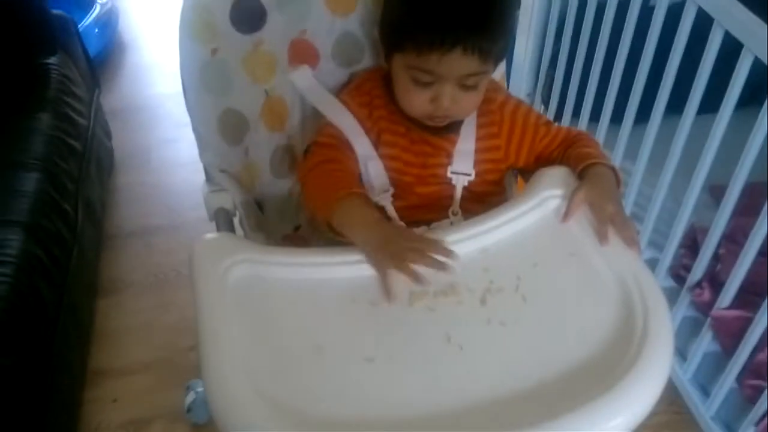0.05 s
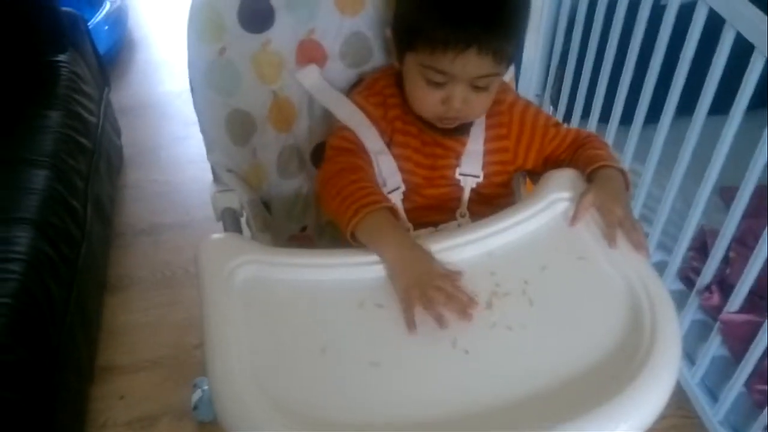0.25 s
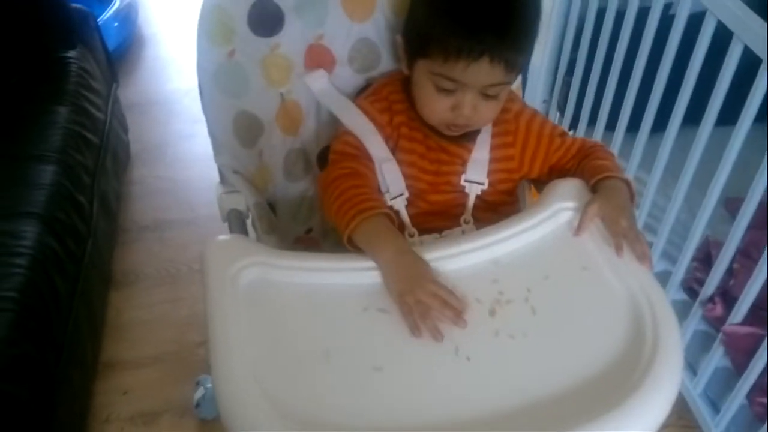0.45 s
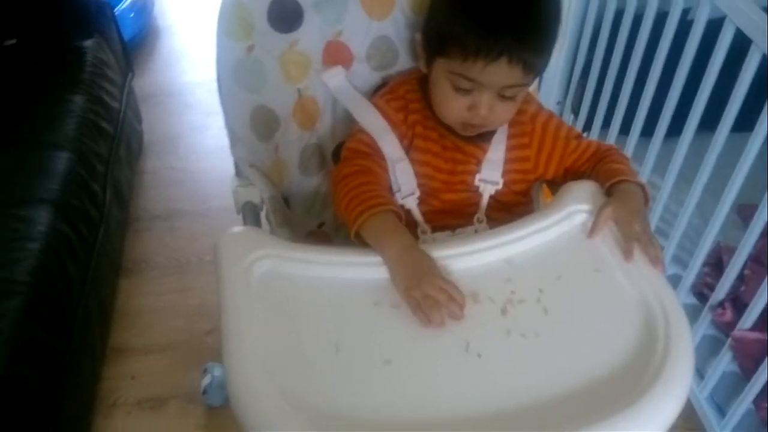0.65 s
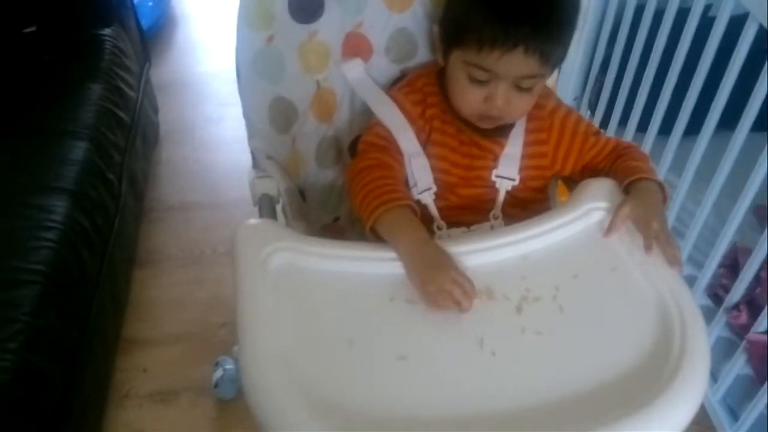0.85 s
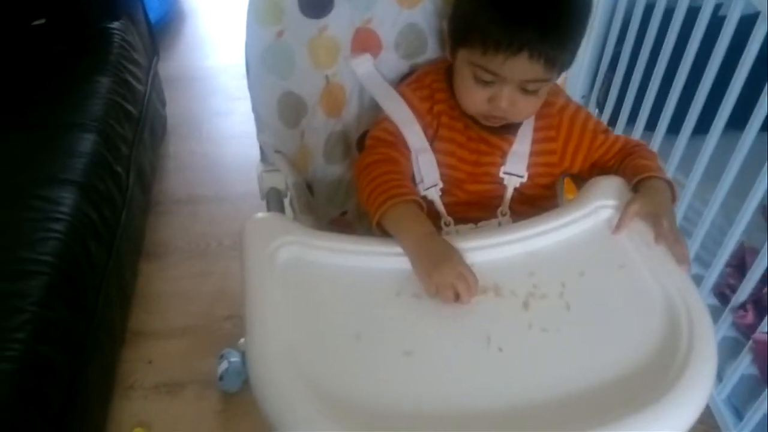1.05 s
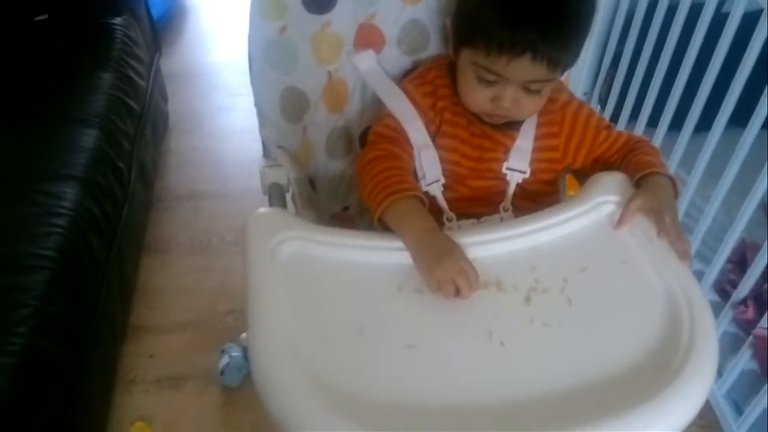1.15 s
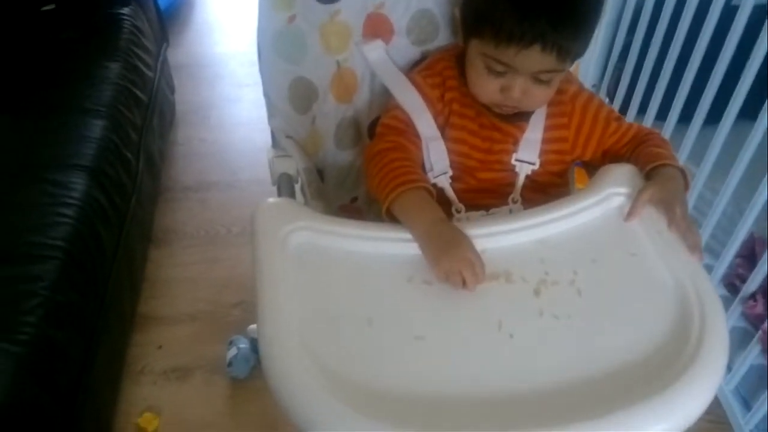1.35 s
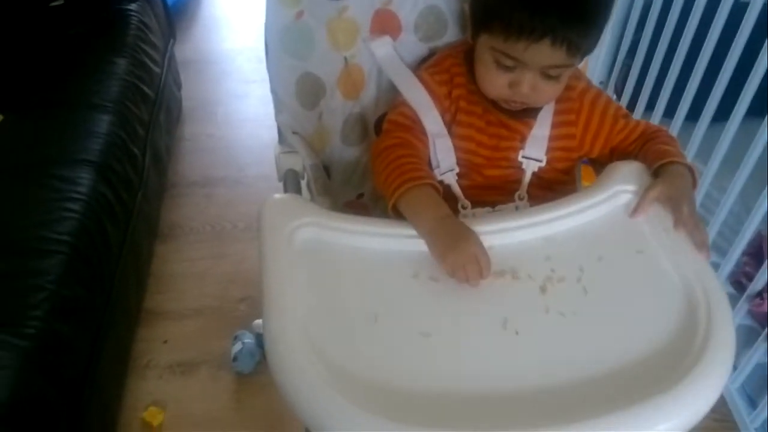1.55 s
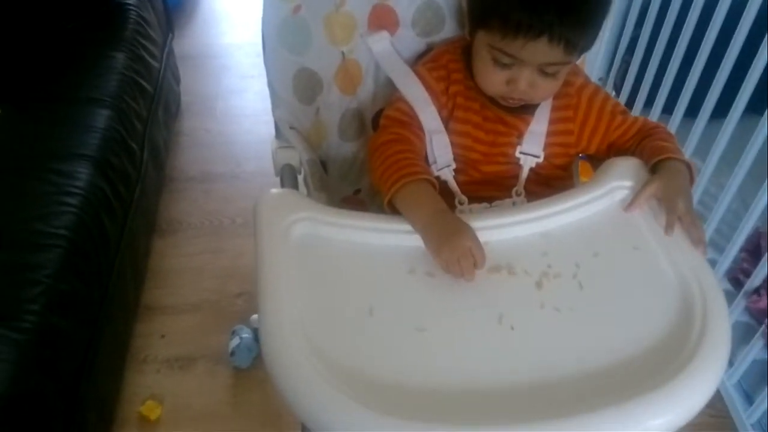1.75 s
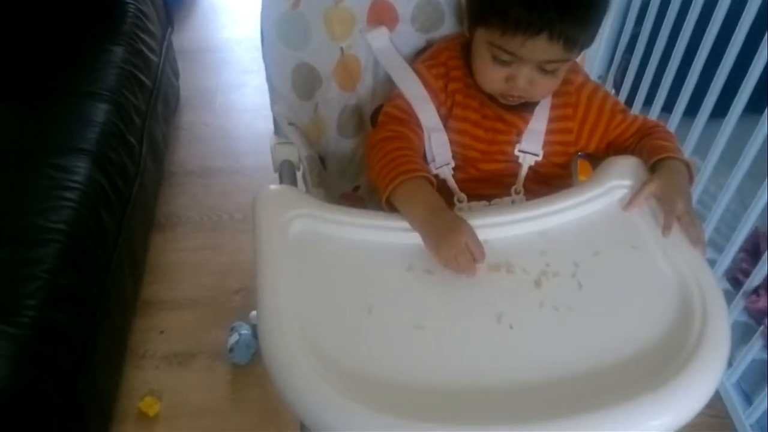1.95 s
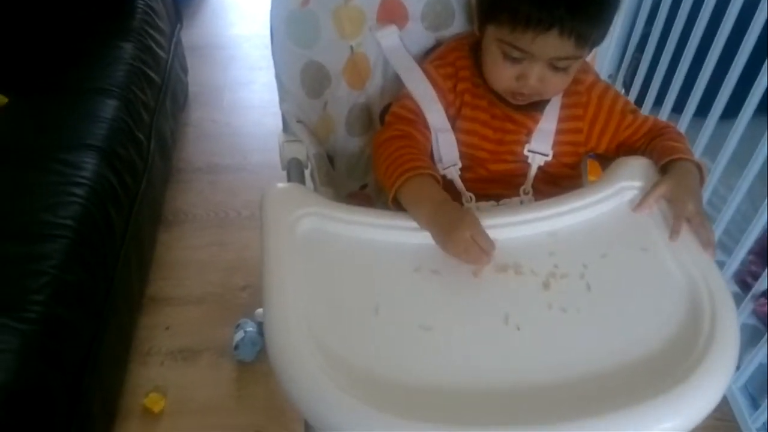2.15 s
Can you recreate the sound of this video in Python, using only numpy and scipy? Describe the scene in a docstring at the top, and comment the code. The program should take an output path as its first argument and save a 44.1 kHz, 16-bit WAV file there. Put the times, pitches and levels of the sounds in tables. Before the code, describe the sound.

One close thump of a palm on a plastic tray, with a short clack and low bounce. Afterwards fingers lightly tap and brush the tray over quiet room noise and a faint distant motor hum.

```python
"""One close thump: a small hand on the plastic tray of a high chair, in a quiet furnished room.
The fingers slap, the palm follows; the tray rings, clacks in its catch and bounces on its mounts.
The whole ring drops quickly in level near 0.3 s. Faint taps and a rustle of sleeve and fingers follow.
Behind them: room noise, a fading hiss, a distant motor speeding up, faint hums and a thin whine."""
import sys
import numpy as np
from scipy import signal
from scipy.fft import rfft, irfft, next_fast_len
from scipy.io import wavfile
from scipy.ndimage import map_coordinates

SR = 44100
rng = np.random.default_rng(int(sys.argv[2]) if len(sys.argv) > 2 else 0)


def to_wav(sig):
    """Store sig (one row per channel, or 1-D mono) as 16-bit WAV at the path in sys.argv[1].

    Samples outside -1..1 are clipped; the rate is SR.
    """
    pcm = np.clip(np.atleast_2d(sig), -1, 1) * 32767
    pcm = np.round(pcm).astype(np.int16)
    wavfile.write(sys.argv[1], SR, pcm.T)  # frames by channels


N = 97020

# left-right likeness of contacts and of background noise: (frequency [Hz], correlation [-1..1])
HIT_CORRELATION = [(100, 0.94), (300, 0.86), (650, 0.86), (1000, 0.43), (1450, 0.061), (2200, -0.49),
                   (4000, -0.22), (9000, 0.98)]
AIR_CORRELATION = [(60, 0.69), (150, 0.42), (380, 0.52), (950, 0.36), (2380, 0.041), (5980, 0.041),
                   (15000, -0.23)]
# tray balance: (frequency [Hz], left lift and right cut [dB])
TRAY_BALANCE = [(60, 1), (180, -1.5), (600, 0.1), (1300, 0.5), (2400, 2.5), (5000, 3.5)]


def thump(drop_s=0.303, drop_span_s=0.0074, drop_db=-5.5):
    """The hand lands in four quick contacts; the whole ring drops quickly in level near 0.3 s."""
    # parts of the hand landing: (time [s], level [dB], brightness [Hz])
    landings = [(.1975, -13, 850), (.2072, -2.5, 3400), (.2145, 0.5, 1100), (.2202, -4, 1700)]
    tray = sum(contact(*row) for row in landings) + pushes()
    blow = placed(tray, TRAY_BALANCE) + slap() + bounce()
    drop = (1 + np.tanh((since(0) - drop_s) / drop_span_s)) / 2
    return blow * amp(drop_db * drop)


def contact(s, db, bright_hz):
    """One touch rings the tray's modes and shell; the room answers 14 ms later."""
    # tray modes: (frequency [Hz], level [dB], t60 [s])
    modes = [(108, -55, .2), (134.6, -43.5, 0.18), (172.1, -46.5, 0.24), (223.4, -56, 0.37),
             (282.6, -47.5, 0.32), (554.5, -41.5, 0.12), (727.3, -35.5, 0.096), (852, -56.5, 0.21),
             (1110, -46, 0.23), (1189.6, -39, 0.15), (1386, -43.5, 0.13), (1524, -41, 0.075),
             (1812, -41, 0.11), (2121, -52, 0.35)]
    # dense shell resonances: (frequency [Hz], density [dB])
    shell_spectrum = [(60, -38), (200, 0.5), (400, -9.5), (640, 1), (800, 7), (1200, -5), (1900, 4.5),
                      (2700, -10.5), (5000, -23), (14000, -34)]
    ring = np.zeros((2, N))
    for hz, mode_db, t60_s in modes:
        spread_rad = half_angle(HIT_CORRELATION, hz) * np.array([[1], [-1]])
        mode = np.sin(2 * np.pi * hz * since(s) + spread_rad)
        ring += amp(mode_db) * lowpass(hz, bright_hz) * fade(s, t60_s, attack_s=0.00055) * mode
    shell = filtered(noise(shell_spectrum, HIT_CORRELATION), lambda hz: lowpass(hz, bright_hz))
    shell *= amp(-33) * fade(s, t60_s=0.088, attack_s=0.00038)
    return amp(db) * (ring + shell + reverb(s + 0.014, bright_hz))


def slap():
    """Skin cracks on the plastic, then the tray clacks in its catch."""
    # crack and clack spectra: (frequency [Hz], density [dB])
    crack_spectrum = [(200, -18), (900, 20), (1500, 13.5), (2600, -4.5), (3500, 1.5), (4300, -7),
                      (5500, -4), (7500, -19), (11000, -20), (15000, -48)]
    clack_spectrum = [(800, -30), (2400, 1), (3650, 7), (4300, -6), (5500, -11.5), (7000, -32),
                      (14000, -47)]
    crack = noise(crack_spectrum, HIT_CORRELATION) * fade(0.2072, t60_s=0.0087, attack_s=0.0001)
    clack = noise(clack_spectrum, HIT_CORRELATION) * fade(0.2235, t60_s=0.044, attack_s=0.00059)
    return amp(-35.5) * pan(left_db=12) * crack + amp(-47) * pan(left_db=3) * clack


def bounce(start_s=0.2178, rest_hz=49.6, sag_hz=13.6, sag_s=0.043):
    """The whole tray swings on its mounts, sagging in pitch."""
    t = since(start_s)
    hz = rest_hz + sag_hz * np.exp(-t / sag_s)
    swing = np.sin(phase(hz * (t > 0))) * fade(start_s, t60_s=0.36, attack_s=0.016)
    return amp(-25.5) * pan(left_db=-1.5) * swing


def pushes():
    """The hand's weight presses the tray down: pressure bumps with a dip on either side."""
    # pressure pulses: (time [s], level [dB], half-width [s])
    pulses = [(0.2007, -47, 0.0014), (0.2206, -31.5, 0.0008), (0.255, -43, .0016)]
    out = np.zeros(N)
    for s, db, half_width_s in pulses:
        x = (since(0) - s) / half_width_s
        out += amp(db) * (1 - x ** 2) * np.exp(-x ** 2 / 2)
    return out


def reverb(s, bright_hz):
    """Room tail of a contact; the decay rate varies with frequency."""
    # room response: (frequency [Hz], density [dB])
    spectrum = [(100, 7), (400, -8), (700, -4.5), (1400, 3), (2100, 4.5), (2800, -6.5), (5000, -15),
                (14000, -31)]
    # room decay: (frequency [Hz], t60 [s])
    decay_times = [(150, 0.35), (700, 0.24), (2000, 0.21), (4000, 0.18), (10000, 0.24)]
    hz, t, bins = signal.stft(noise(spectrum, HIT_CORRELATION), SR, nperseg=256)
    hz = hz[:, None]
    decay = amp(-60 * np.maximum(t - s, 0) / along(decay_times, hz))
    _, tail = signal.istft(bins * decay * lowpass(hz, bright_hz), SR, nperseg=256)
    build_up = 1 - np.exp(-since(s) / 0.0054)
    return amp(-37.5) * tail[:, :N] * build_up


def taps():
    """Fingers touch the tray lightly, twice."""
    # finger contacts: (time [s], level [dB], brightness [Hz])
    touches = [(.629, -26.5, 840), (1.096, -27.5, 1200)]
    return placed(sum(contact(*row) for row in touches), TRAY_BALANCE)


def brushes(width_oct=1.37, grain_db=2):
    """Sleeve and fingers rub the tray: grainy noise bands that swell and fade."""
    # strokes: (peak time [s], length [s], level [dB], centre [Hz])
    strokes = [(0.48, 0.17, -75.5, 1880), (0.577, 0.0073, -71.5, 8900), (1.32, 0.042, -72, 2180),
               (1.399, 0.12, -73.5, 2600), (1.487, 0.061, -73, 4040), (1.587, 0.072, -77, 4360),
               (1.593, 0.19, -71.5, 1970), (1.853, .12, -79, 10000)]
    out = np.zeros((2, N))
    for peak_s, length_s, db, centre_hz in strokes:
        band = lambda hz: 1 / (1 + (2 * np.log2((hz + 1) / centre_hz) / width_oct) ** 2)
        rub = filtered(rng.standard_normal((2, N)), band)
        grain = amp(grain_db * wobble(rate_hz=180))
        swell = np.exp(-(2 * (since(0) - peak_s) / length_s) ** 2)
        out += amp(db) * unit(rub * grain) * swell
    return pan(left_db=2) * out


def motor(waver_db=1, rush_db=-8.5):
    """A distant motor slowly speeds up: a low tone with an airy rush."""
    # motor tone: (time [s], frequency [Hz], level [dB])
    track = [(0, 83.54, -72), (1.002, 86, -71), (1.351, 88, -65.5), (2.2, 95.34, -65.5)]
    # airy rush: (frequency [Hz], density [dB])
    rush_spectrum = [(100, -5), (220, -5), (320, 5), (480, -7.5), (660, 4.5), (900, -9), (1400, -18.5),
                     (4000, -40)]
    hz, db = over_time(track)
    tone = amp(waver_db * wobble(rate_hz=7.14)) * np.sin(phase(hz))
    rush = amp(rush_db) * noise(rush_spectrum, AIR_CORRELATION)
    return amp(db) * (tone + rush)


def hums(drone_hz=417, waver_db=1, waver_rad=0.5):
    """Faint wavering hum lines, and a drone that comes and goes."""
    # hum lines: (frequency [Hz], start level [dB], end level [dB])
    ramps = [(120.5, -73.5, -72), (623, -114, -77.5)]
    # drone swells: (time [s], level [dB])
    swells = [(.85, -92), (1.05, -72.5), (1.2, -98), (1.4, -73), (1.75, -90.5), (1.93, -69), (2.2, -80.5)]
    lines = [(hz, np.linspace(start_db, end_db, N)) for hz, start_db, end_db in ramps]
    lines.append((drone_hz, over_time(swells)[0]))
    out = np.zeros(N)
    for hz, db in lines:
        gain = amp(db + waver_db * wobble(rate_hz=6))
        out += gain * np.sin(2 * np.pi * hz * since(0) + waver_rad * wobble(rate_hz=8))
    return out


def whine(half_width_hz=55):
    """A thin, high noise band drifts in pitch and level."""
    # band drift: (time [s], centre [Hz], level [dB])
    track = [(0, 3350, -81), (.55, 3355, -80.5), (.8, 3070, -86.5), (1.4, 3210, -89.5),
             (1.699, 3287, -83.5), (2.2, 3270, -84.5)]
    hz, db = over_time(track)
    i, q = filtered(rng.standard_normal((2, 2, N)), lambda f: lowpass(f, half_width_hz))
    return amp(db) * unit(i * np.cos(phase(hz)) + q * np.sin(phase(hz)))


def room_noise(hiss_db_per_s=-10):
    """Steady low room noise and a faint hiss that dies away."""
    # room noise and hiss spectra: (frequency [Hz], density [dB])
    air_spectrum = [(20, -89), (52, -82), (110, -94), (220, -101), (320, -100), (480, -103), (720, -99),
                    (1400, -110), (2700, -111), (3200, -109), (3600, -115), (6000, -118), (10000, -119),
                    (15500, -122.5)]
    hiss_spectrum = [(500, -5), (2000, 3), (4000, -1), (8000, -5.5), (15000, -15.5)]
    # balance of both: (frequency [Hz], left lift and right cut [dB])
    balance = [(40, 1), (120, 2.3), (650, 2), (1500, 1.3), (8000, 1), (15000, -0.5)]
    air = amp(-64.5) * noise(air_spectrum, AIR_CORRELATION)
    hiss = amp(-75 + hiss_db_per_s * since(0)) * noise(hiss_spectrum, AIR_CORRELATION)
    return placed(air + hiss, balance)


def amp(db):
    """Decibels to gain."""
    return 10 ** (np.asarray(db) / 20)


def unit(x):
    """Scale to rms 1."""
    return x / np.sqrt(np.mean(x ** 2) + 1e-20)


def since(s):
    """Seconds since s, zero before it."""
    return np.maximum(np.arange(N) / SR - s, 0)


def phase(hz):
    """Running phase [rad] of a varying frequency."""
    return 2 * np.pi * np.cumsum(hz) / SR


def fade(s, t60_s, attack_s):
    """Quick rise at s, then exponential decay."""
    t = since(s)
    return (1 - np.exp(-t / attack_s)) * amp(-60 * t / t60_s)


def wobble(rate_hz):
    """Smooth random curve, rate_hz knots a second."""
    knots = rng.standard_normal(int(N * rate_hz / SR) + 4)
    return map_coordinates(knots, [np.arange(N) * rate_hz / SR])


def over_time(points):
    """One per-sample curve for each column after the time column."""
    s, *columns = np.transpose(points)
    return [np.interp(since(0), s, column) for column in columns]


def along(points, hz):
    """Interpolate (frequency, value) points on a log axis."""
    knots_hz, values = np.transpose(points)
    return np.interp(np.log(hz + 1), np.log(knots_hz + 1), values)


def lowpass(hz, corner_hz):
    """Second-order low-pass gain."""
    return 1 / np.sqrt(1 + (hz / corner_hz) ** 4)


def filtered(x, response):
    """Apply the gain response(hz)."""
    size = next_fast_len(N + SR // 2)
    return irfft(rfft(x, size) * response(np.fft.rfftfreq(size, 1 / SR)), size)[..., :N]


def half_angle(correlation, hz):
    """Half the left-right angle [rad] that gives this correlation."""
    return np.arccos(np.clip(along(correlation, hz), -1, 1)) / 2


def noise(spectrum, correlation):
    """Coloured stereo noise of rms 1; the spectrum sets shape only."""
    def response(hz):
        angle = half_angle(correlation, hz)
        return amp(along(spectrum, hz)) * [np.cos(angle), np.sin(angle)]
    mid, side = filtered(rng.standard_normal((2, N)), response)
    return unit(np.array([mid + side, mid - side]))


def pan(left_db):
    """Gains that lift the left channel and cut the right."""
    return amp(left_db * np.array([[1], [-1]]))


def placed(x, balance):
    """Pan by frequency."""
    return filtered(x, lambda hz: pan(along(balance, hz)))


def scene():
    """The thump and the small sounds after it, over the quiet room."""
    hand = thump() + taps() + brushes()
    tones = pan(left_db=1) * (motor() + hums() + whine())
    return hand + tones + room_noise()


def record(dry, top_hz=15700):
    """Brick-wall low-pass."""
    return filtered(dry, lambda hz: hz < top_hz)


dry = scene()
out = record(dry)
to_wav(out)
```